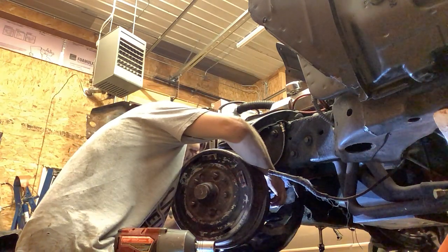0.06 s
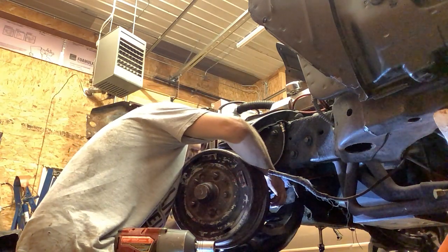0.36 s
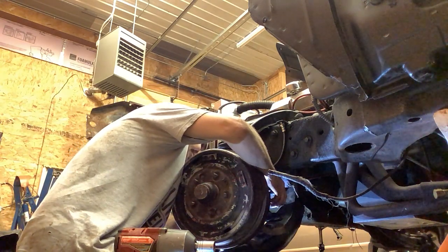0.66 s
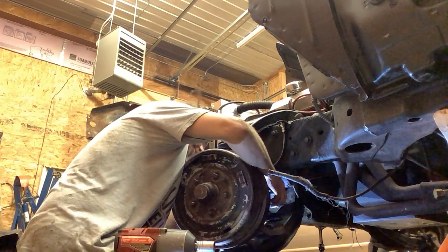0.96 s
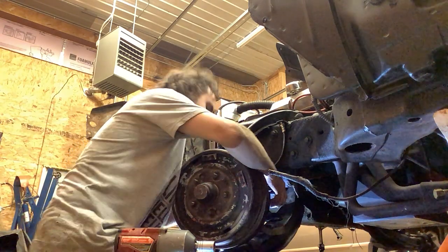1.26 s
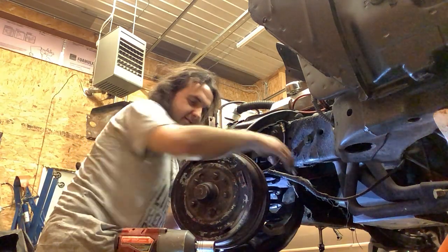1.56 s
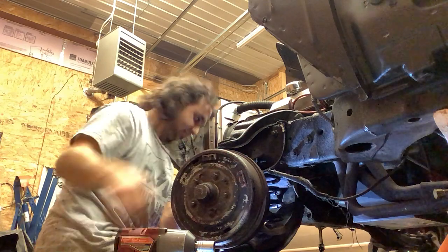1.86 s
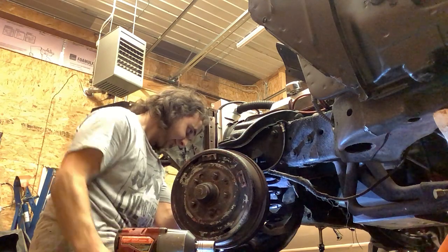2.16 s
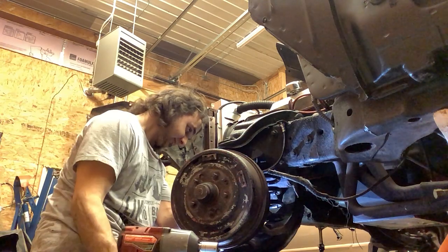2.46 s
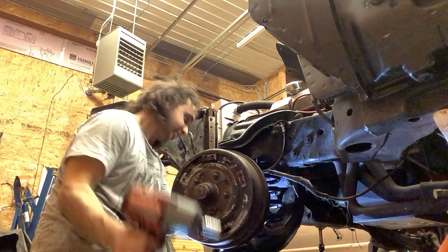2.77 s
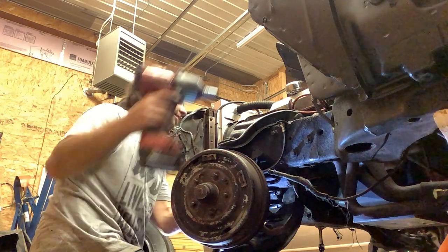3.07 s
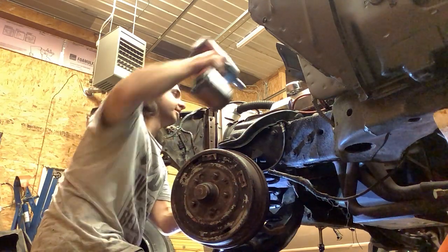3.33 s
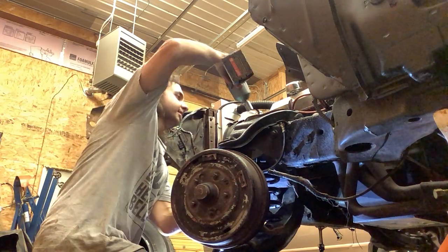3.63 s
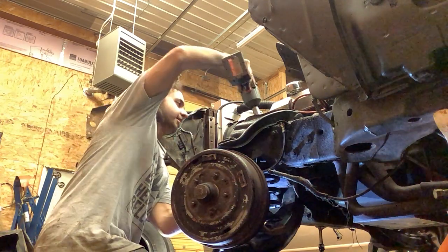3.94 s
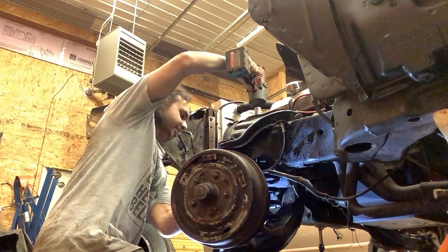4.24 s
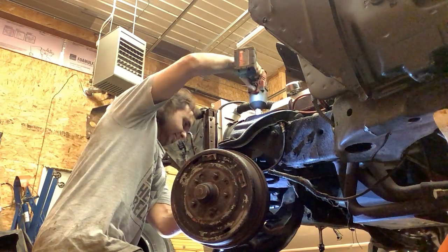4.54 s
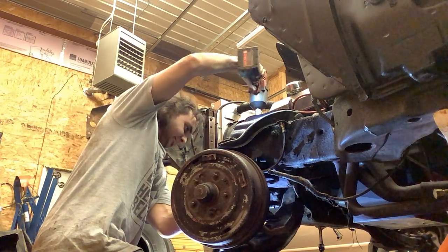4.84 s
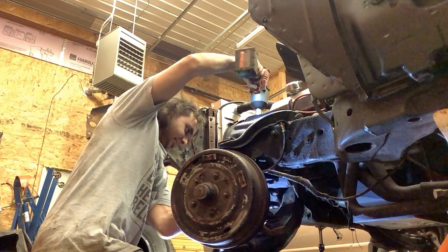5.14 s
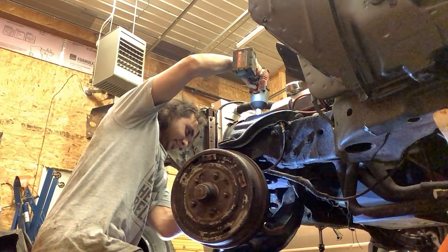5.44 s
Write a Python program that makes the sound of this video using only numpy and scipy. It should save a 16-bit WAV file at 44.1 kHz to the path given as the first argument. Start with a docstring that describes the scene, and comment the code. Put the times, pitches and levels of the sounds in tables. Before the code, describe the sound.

Soft fan air and a low electrical hum run throughout in a slightly echoing workshop, heard from close to a car's wheel well. During the first second a steel wrench clinks lightly on the suspension several times, ringing briefly. A sleeve brushes past at about 1.3 seconds, with a faint thud. Around 1.8 seconds the wrench clatters and rings brightly, then clanks again at 2.2. Light knocks and rustles follow near 3 seconds as a cordless impact driver is lifted, and it seats on a nut with a sharp double clack at 3.9. The driver fires four very short bursts at roughly 4.5, 4.8, 5.2 and 5.5 seconds, each with a thin high whistle, buzzing gear rattle and hammer clacks. On the first, the joint lets go with a bang, the loudest moment, whose low boom rings through the chassis beneath the remaining bursts.

```python
"""A workshop, one microphone close to a car's front wheel well, fan air and mains hum behind.
First a wrench clinks on the suspension; a sleeve brushes past and the wrench is put down, ringing.
From about 3 s a cordless impact driver is lifted and seated on a nut. From 4.5 s it is triggered four
times: its speed control whistles, its gears rattle and buzz, the hammer clacks. On the first pull the
joint lets go with a bang that booms through the chassis under the three pulls that follow."""
import sys
import numpy as np
from scipy import signal
from scipy.io import wavfile

SR = 44100
rng = np.random.default_rng(int(sys.argv[2]) if len(sys.argv) > 2 else 0)


def pcm_store(signal):
    """Save signal as 16-bit PCM."""
    levels = np.round(np.clip(np.atleast_2d(signal), -1, 1) * 32767)
    wavfile.write(sys.argv[1], SR, levels.astype(np.int16).T)


N = 251370
TIME = np.arange(N) / SR
AGE = TIME[:SR]  # the second after a strike

# fan air in the room: frequency_hz, level_db
AIR_SPECTRUM = [(25, -37.5), (45, -12.5), (80, -4.5), (170, 2), (300, 2), (400, -8), (600, -8), (1000, -14),
                (1500, -14.5), (2500, -25), (4000, -37.5), (7000, -40.5), (12000, -42.5), (15800, -55)]
# decay of the room: frequency_hz, t60_s
ROOM_DECAY = [(100, 1), (400, 0.98), (1500, 1), (3000, 0.8), (6000, 0.62), (10000, 0.46), (15000, 0.41)]
# shirt and arm brushing past the wheel well: peak_s, level_db, swell_s
CLOTH_STROKES = [(1.283, -50.5, 0.047), (1.425, -59, 0.014), (1.61, -65.5, 0.053), (2.25, -60, .035),
                 (2.665, -64.5, 0.015), (2.859, -70, 0.023), (3.0, -60.5, 0.017), (3.055, -76, 0.019)]
# rubbing cloth: frequency_hz, level_db
CLOTH_SPECTRUM = [(150, 0), (400, -0.5), (1200, 1.5), (2300, -1), (5000, -3.5), (8000, -9), (11500, -15),
                  (15800, -30)]
# jolts of the chassis: start_s, level_db
CHASSIS_JOLTS = [(1.425, -48), (3.868, -37), (4.564, -23.5)]
# modes of the chassis: pitch_hz, level_db, t60_s
CHASSIS_MODES = [(85, -8, 1.7), (145, 0, .65), (181, -4, 1.0), (220, -6, .9), (292, -6, .35),
                 (376, -3, .35), (472, -2, .3), (674, -2, .3), (1240, -14, 1.0)]
# the panels' short thud, long boom and drone under the running tool: frequency_hz, level_db
THUD_SPECTRUM = [(60, -4.5), (150, 4), (300, 15), (700, 0.5), (1200, -4), (2500, -2), (6000, -56)]
BOOM_SPECTRUM = [(30, -82), (60, -1), (130, 3), (220, -4), (400, -24.5), (1000, -21), (2000, -18),
                 (5000, -87)]
DRONE_SPECTRUM = [(40, -11), (80, 3.5), (160, 1.5), (320, -4), (500, -7.5), (1200, -8.5), (2500, -15.5),
                  (6000, -39)]
# wrench on the suspension: start_s, level_db, clash_offset_db, edge_hz, strike_point (0 jaw, 1 handle)
WRENCH_CLINKS = [(-0.14, -37.5, 14, 11000, 0.52), (0.109, -55, 7.5, 3600, 0.68),
                 (0.173, -39.5, -8, 9900, 0.023), (0.236, -45.5, -2, 6100, 0.96),
                 (0.485, -45.5, -3, 8900, 0.57), (0.812, -41, 0, 6850, 0.83), (0.872, -50, 4, 11000, 1)]
# modes of the held wrench, struck at either end: pitch_hz, jaw_db, handle_db
HELD_MODES = [(678, -4, -9), (1010, -20, -12), (1150, -22, -16), (1427, -10, -11), (1604, -7, -17),
              (1798, -8, -16), (2008, -6, -3), (2207, -6, -6), (2266, -12, -7), (2433, -11, -20),
              (2676, -19, -13), (2880, -7, -6), (3397, 0, -17), (3650, -10, -9), (3898, -7, -3),
              (4161, -4, -26), (4447, -11, -3), (4710, -10, -15), (4759, 0, -16), (5006, -16, -21),
              (5303, -19, -8), (5346, -9, -15), (5599, -18, -4), (5965, -15, -28), (6519, -25, -21),
              (6928, -7, -20), (7262, -19, -20), (7569, -9, -21), (7822, -28, -16), (8290, -25, -22)]
# the wrench pulled off and put down: start_s, level_db, ring_offset_db, edge_hz
WRENCH_DROPS = [(1.753, -41, -38, 14100), (1.77, -48, -31, 12000), (1.851, -30.5, -3.5, 9300),
                (2.199, -36.5, -19, 3580), (2.211, -46.5, -11, 5640)]
# modes of the loose wrench: pitch_hz, level_db
LOOSE_MODES = [(1857, -65), (2439, -64), (2692, -65), (3214, -65), (3391, -58), (3677, -61), (3930, -67),
               (4129, -66), (4183, -67), (4479, -57), (4764, -61), (5044, -68), (5378, -60), (5674, -62),
               (5975, -65), (6621, -64), (6939, -54), (7187, -62), (7402, -67), (7564, -55), (7849, -59),
               (7951, -63), (8301, -61), (8473, -62), (14440, -60)]
# clash of steel on steel: frequency_hz, level_db
STEEL_SPECTRUM = [(150, -20), (400, -2), (1200, -1), (2200, 0), (4500, -0.5), (6200, -8), (7600, 0.5),
                  (9000, -14.5), (15000, -16)]
# ring of steel before contact damping: frequency_hz, t60_s
STEEL_DECAY = [(700, .25), (2000, .52), (4500, .52), (7000, .55), (8500, .3), (14500, .15)]
# knocks of driver, socket and hammer: start_s, level_db, tilt_db_per_octave, edge_hz
DRIVER_KNOCKS = [(2.765, -57, -2, 1770), (3.019, -43, 9, 4400), (3.139, -44, 0, 14000),
                 (3.249, -50, 0.5, 10100), (3.857, -22.5, -1, 16000), (3.905, -26.5, 1.5, 3600),
                 (4.143, -45, 1, 5460), (4.484, -34, 3.5, 7000), (4.522, -26, 2, 16000),
                 (4.529, -17, 1, 8850), (4.558, -13.5, 0.5, 16000), (4.566, -19, -5.5, 10000),
                 (4.659, -30.5, 0, 14000), (4.707, -39.5, 2.5, 14000), (4.809, -35, 4, 16000),
                 (4.93, -28.5, 0, 14000), (4.972, -29, 1.5, 15700), (4.985, -33, -2, 13960),
                 (5.208, -32, 2.5, 5000), (5.365, -30, 1.5, 13900), (5.397, -30.5, -1.5, 14000),
                 (5.425, -26, -0.5, 16000), (5.573, -25, 1, 15900)]
# clack of one knock: frequency_hz, level_db
KNOCK_SPECTRUM = [(120, -21), (250, -10), (600, -4.5), (1400, -10), (2600, -4.5), (3200, -3.5),
                  (3700, -6.5), (5300, -8), (6000, -13), (7600, -8), (8300, -12.5), (11000, -15),
                  (15800, -30)]
# resonances of the driver's housing and the joint under it: pitch_hz, width_hz, level_db
HOUSING_MODES = [(1211, 13.3, -0.5), (1790, 76, -5), (2020, 130, -2.5), (2637, 76, 1), (3102, 78, 4),
                 (3740, 110, -8.5), (5550, 160, -9.5)]
# pings of the socket: start_s, level_db
SOCKET_PINGS = [(4.563, -15), (4.909, -28)]
# trigger pulls: start_s, held_s, run_down_s, top_commutation_hz, rattle_db, buzz_db, whistle_db, load (0-1)
TRIGGER_PULLS = [(4.467, 0.084, .03, 299.7, -39.5, -32.5, -40, 0),
                 (4.787, 0.1, .09, 489.6, -34, -29.5, -37.5, 0.16),
                 (5.191, .127, .17, 349.3, -37, -33, -38, 0.07),
                 (5.548, 0.11, .12, 661, -31, -30, -40.5, 1)]
# loose gear teeth: frequency_hz, level_db
RATTLE_SPECTRUM = [(59, -39), (100, -10), (224, -26), (295, -3.5), (511, -20.5), (1140, -18), (1380, -20.5),
                   (2200, -11.5), (2670, -14.5), (3440, -15), (4340, -11), (5250, -21.5), (6920, -18.5),
                   (7690, -18.5), (15800, -35)]

AIR_DB, HUM_HZ, HUM_DB = -52.5, 118.7, -55
FIRM_DB, FIRM_T60_S, DOUBLING_DB = -30, 0.056, 53  # a firm knock; this much harder lasts twice as long
RING_DB, RING_PER_DB = -12.5, 0.0324  # housing ring under a firm knock; its share grows with force
SPIN_UP_S, TAKE_UP_S, RELEASE_S = 0.048, 0.0125, 0.0046  # speed gathers, gears bite, current dies
STALL_WHISTLE, STALL_RATTLE, COAST_RATTLE = 0.26, 0.47, 0.97  # shares when barely turning or unpowered
TORQUE_S, STALL_TORQUE = 0.041, 0.21  # time scale of the torque surge; torque there from the start
GRIND, GRIND_HZ = 0.81, 129  # extra tooth noise as the rotor breaks loose; fades above this rate
MESH_ORDER, MESH_DB = 4, 5  # loaded gears sing at this multiple of the commutation rate
SWITCH_HZ, BUZZ_HZ, BUZZ_Q = 7945, 2793, 7.1  # speed control; the housing's main resonance


def amp(db):
    """Decibels to gain."""
    return 10 ** (np.asarray(db) / 20)


def unit(x):
    """Scales to rms 1."""
    return x / np.sqrt(np.mean(x ** 2) + 1e-20)


def read(points, hz):
    """A table's value at any frequency."""
    f, value = np.transpose(points)
    return np.interp(np.log(hz + 1), np.log(f + 1), value)


def add(mix, start_s, sound):
    """Mixes a sound in at a time; one that began before zero is already dying away."""
    start = round(start_s * SR)
    sound = sound[max(-start, 0):]
    part = mix[max(start, 0):][:len(sound)]
    part += sound[:len(part)]


def colour(x, spectrum, tilt=0, edge_hz=1e6, size=4096):
    """Minimum-phase filter of unit energy: a spectrum, a tilt and a steep upper edge."""
    hz = abs(np.fft.fftfreq(size, 1 / SR))
    db = read(spectrum, hz) + tilt * np.log2(np.maximum(hz, 500) / 3000)
    db -= 10 * np.log10(1 + (hz / edge_hz) ** 12)
    log_gain = np.log(amp(np.maximum(db - db.max(), -100)))
    taps = np.fft.ifft(np.exp(np.conj(signal.hilbert(log_gain)))).real[:size // 2]
    return signal.fftconvolve(x, taps / np.linalg.norm(taps))[:len(x)]


def rise(seconds):
    """Vibration takes a moment to spread through a part."""
    return 1 - np.exp(-(AGE / max(seconds, 1e-4)) ** 2)


def fade(t60):
    """A second of exponential decay."""
    return np.exp(-np.log(1000) * AGE / max(t60, 1e-3))


def burst(t60):
    """The dense, quickly dying modes of a struck assembly."""
    return rng.standard_normal(SR) * fade(t60)


def ring(modes):
    """Separate decaying modes, starting at rms 1."""
    hz, db, t60 = np.transpose(list(modes))
    tones = sum(amp(d) * fade(t) * np.sin(2 * np.pi * (f * AGE + rng.random()))
                for f, d, t in zip(hz, db, t60))
    return tones / np.sqrt(np.sum(amp(db) ** 2) / 2)


def wander(hz):
    """Random drift of rms 1."""
    return unit(np.interp(TIME * hz, np.arange(SR), rng.standard_normal(SR)))


def room_tone():
    """Behind the work: fan air and a slightly wavering mains hum."""
    air = colour(rng.standard_normal(N), AIR_SPECTRUM, size=16384)
    hum = amp(1.5 * wander(5)) * unit(np.sin(2 * np.pi * HUM_HZ * TIME + 0.5 * wander(4)))
    return amp(AIR_DB) * air + amp(HUM_DB) * hum


def reflections(x, near_db, tail_db):
    """The microphone gets the direct sound, quick echoes off the wheel well, then the room's tail."""
    near = rng.standard_normal(SR) * (rng.random(SR) < 2500 / SR) * fade(0.078) * (AGE > 0.0015)
    hz, t, bands = signal.stft(rng.standard_normal(SR), SR, nperseg=256)
    bands *= np.exp(-np.log(1000) * t / read(ROOM_DECAY, hz)[:, None])
    tail = signal.istft(bands, SR, nperseg=256)[1][:SR]
    tail *= 1 - np.exp(-AGE / 0.0096)
    echo = amp(near_db) * near / np.linalg.norm(near) + amp(tail_db) * tail / np.linalg.norm(tail)
    return x + signal.fftconvolve(x, echo)[:N]


def cloth_rustle():
    """Cloth rubs in many tiny uneven slips; each stroke swells and dies away."""
    slips = rng.standard_normal(N) * amp(3.0 * wander(400))
    strokes = sum(amp(db) / np.cosh(np.minimum(abs(TIME - peak_s) / swell_s, 20))
                  for peak_s, db, swell_s in CLOTH_STROKES)
    return unit(colour(slips, CLOTH_SPECTRUM)) * strokes


def chassis_jolts():
    """A jolt thuds in the panels; the heavy low modes take a moment to swell."""
    out = np.zeros(N)
    for start_s, db in CHASSIS_JOLTS:
        thud = amp(db + 7) * colour(burst(0.14) * rise(0.0072), THUD_SPECTRUM)
        modes = amp(db - 2.5) * ring(CHASSIS_MODES)
        boom = amp(db - 3) * colour(burst(0.98), BOOM_SPECTRUM)
        add(out, start_s, thud + rise(0.021) * (modes + boom))
    return out


def chassis_drone(shaking):
    """The running tool shakes the chassis, whose panels ring on after it stops."""
    panels = colour(burst(t60=0.82), DRONE_SPECTRUM)
    panels /= np.linalg.norm(panels)
    return amp(-7.5) * signal.fftconvolve(shaking * rng.standard_normal(N), panels)[:N]


def steel_ring(hz, db, edge_hz):
    """A soft blow misses the high modes; contact damps part of the ring at once."""
    excited_db = db - 10 * np.log10(1 + (hz / edge_hz) ** 8)
    damping = 0.36 + 1.99 * fade(0.16)
    return ring(zip(hz, excited_db, read(STEEL_DECAY, hz))) * damping * rise(0.0037)


def wrench_clinks():
    """Steel on steel, close by: a short clash, then the modes that the strike point favours ring on."""
    clash, tones = np.zeros((2, N))
    hz, jaw_db, handle_db = np.transpose(HELD_MODES)
    for start_s, db, clash_db, edge_hz, point in WRENCH_CLINKS:
        strike = colour(burst(0.19) * rise(0.0019), STEEL_SPECTRUM, edge_hz=edge_hz)
        add(clash, start_s, amp(db + clash_db) * strike)
        add(tones, start_s, amp(db) * steel_ring(hz, jaw_db + point * (handle_db - jaw_db), edge_hz))
    return np.array([clash, tones])


def wrench_drops():
    """The loose wrench clatters against the frame and rings."""
    clash, tones = np.zeros((2, N))
    for start_s, db, ring_db, edge_hz in WRENCH_DROPS:
        strike = colour(burst(0.14) * rise(0.0021), STEEL_SPECTRUM, edge_hz=edge_hz)
        add(clash, start_s, amp(db) * strike)
        add(tones, start_s, amp(db + ring_db) * steel_ring(*np.transpose(LOOSE_MODES), edge_hz))
    return np.array([clash, tones])


def driver_knocks():
    """Hammer and socket clack, longer when struck harder; the housing hums briefly, the socket pings."""
    clash, shaking, tones = np.zeros((3, N))
    for start_s, db, tilt, edge_hz in DRIVER_KNOCKS:
        force_db = db - FIRM_DB
        t60 = FIRM_T60_S * 2 ** (force_db / DOUBLING_DB)
        add(clash, start_s, amp(db) * colour(burst(t60) * rise(0.00072), KNOCK_SPECTRUM, tilt, edge_hz))
        shudder = burst(0.037) + 0.032 * burst(0.37)
        add(shaking, start_s, amp(db + RING_DB + RING_PER_DB * force_db) * shudder)
    for hz, width_hz, db in HOUSING_MODES:
        resonance = signal.lfilter(*signal.iirpeak(hz, hz / width_hz, fs=SR), shaking)
        clash += amp(db) * np.sqrt(SR / (np.pi * width_hz)) * resonance
    for start_s, db in SOCKET_PINGS:
        add(tones, start_s, amp(db) * ring([(7520, 0.5, 0.064), (8060, -10.5, 0.096)]) * rise(0.0015))
    return np.array([clash, tones])


def trigger_pull(start_s, held_s, run_down_s, top_hz, rattle_db, buzz_db, whistle_db, load):
    """One squeeze: rattle and whistle grow with speed, the buzz with torque; then the motor runs down."""
    age = np.maximum(TIME - start_s, 0)
    released = np.maximum(age - held_s, 0)
    coast = np.clip(1 - released / run_down_s, 0, 1)
    speed = (1 - np.exp(-(age / SPIN_UP_S) ** 2)) * coast
    power = np.minimum(age / 0.0075, 1) * np.exp(-released / RELEASE_S)
    meshed = np.clip((age - TAKE_UP_S) / 0.0026, 0, 1)
    surge = age / TORQUE_S
    torque = power * (STALL_TORQUE + surge) * np.exp(-surge ** 2 / 2)
    loaded = power * load * speed ** 2
    rattle = meshed * (STALL_RATTLE * coast + (1 - STALL_RATTLE) * speed)
    rattle *= COAST_RATTLE + (1 - COAST_RATTLE) * power
    whistle = power * (STALL_WHISTLE + (1 - STALL_WHISTLE) * speed)
    return np.array([top_hz * speed, amp(rattle_db) * rattle, amp(buzz_db) * meshed * (torque + loaded),
                     amp(buzz_db) * loaded, amp(whistle_db) * whistle])


def control_whistle(cycles):
    """The speed control's switched current is chopped again at each commutation, making sidebands."""
    return unit(sum(amp(db) * np.cos(2 * np.pi * (SWITCH_HZ * TIME + k * cycles + k * k / 8))
                    for k, db in [(-2, -14), (-1, 0), (0, -8), (1, -6), (2, -10)]))


def gear_rattle(cycles):
    """Loose teeth strike at random, harder at one point of each shaft turn (six commutations)."""
    teeth = rng.standard_normal(N) * amp(np.minimum(rng.exponential(1, N), 4))
    teeth *= rng.random(N) < 5000 / SR
    teeth *= amp(2.0 * np.cos(2 * np.pi * cycles / 6) + 1.9 * wander(250))
    return unit(colour(unit(teeth), RATTLE_SPECTRUM))


def housing_resonance(x):
    """The housing passes only what lies near its main resonance."""
    peak = signal.iirpeak(BUZZ_HZ, BUZZ_Q, fs=SR)
    return signal.lfilter(*peak, signal.lfilter(*peak, x))


def housing_buzz(cycles, rate_hz, gain):
    """Torque ripple and tooth noise sing in the housing."""
    ripple = sum(np.cos(2 * np.pi * (k * cycles + rng.random())) for k in range(1, 24)) / np.sqrt(12)
    grind = (0.78 + GRIND * np.exp(-(rate_hz / GRIND_HZ) ** 2)) * rng.standard_normal(N)
    buzz = housing_resonance(ripple + grind)
    return gain * buzz / np.sqrt(np.average(buzz ** 2, weights=gain ** 2))


def impact_driver():
    """The running tool, close up: motor commutation paces its whistle, rattle, buzz and gear tone."""
    controls = sum(trigger_pull(*row) for row in TRIGGER_PULLS)
    rate_hz, rattle_gain, buzz_gain, mesh_gain, whistle_gain = controls
    cycles = np.cumsum(rate_hz * (1 + 0.00815 * wander(200))) / SR
    whistle = whistle_gain * control_whistle(cycles)
    rattle = rattle_gain * gear_rattle(cycles)
    buzz = housing_buzz(cycles, rate_hz, buzz_gain)
    mesh = amp(MESH_DB) * housing_resonance(mesh_gain * np.sin(2 * np.pi * MESH_ORDER * cycles))
    return np.array([rattle + buzz, mesh + whistle + chassis_drone(rattle_gain)])


def scene():
    """What reaches the microphone at the wheel well; the clatter carries more echo than the ringing."""
    noises, tones = wrench_clinks() + wrench_drops() + driver_knocks() + impact_driver()
    clatter = reflections(noises + cloth_rustle(), near_db=-5, tail_db=-9)
    ringing = reflections(tones + chassis_jolts(), near_db=-13, tail_db=-11)
    return (clatter + ringing + room_tone())[None]


def record(dry):
    """The mono microphone drops the deep bass and the very top of the treble."""
    thin = signal.sosfilt(signal.butter(4, 52, "highpass", fs=SR, output="sos"), dry)
    lowpass = signal.firwin(511, 15950, window=("kaiser", 9), fs=SR)
    return signal.oaconvolve(thin, lowpass[None], "same")


dry = scene()
out = record(dry)
pcm_store(out)
```